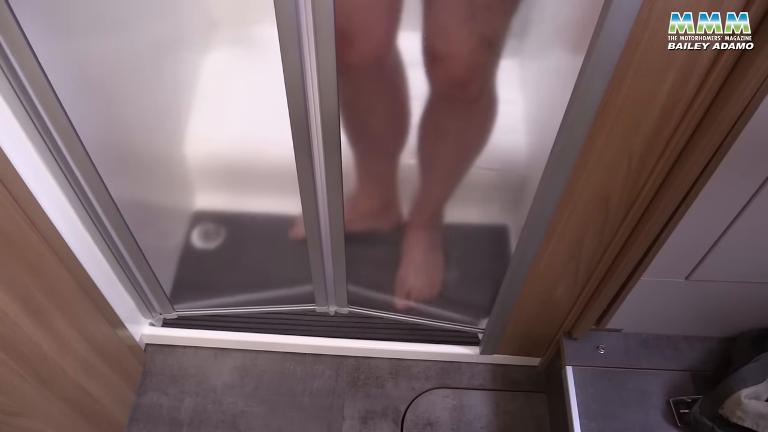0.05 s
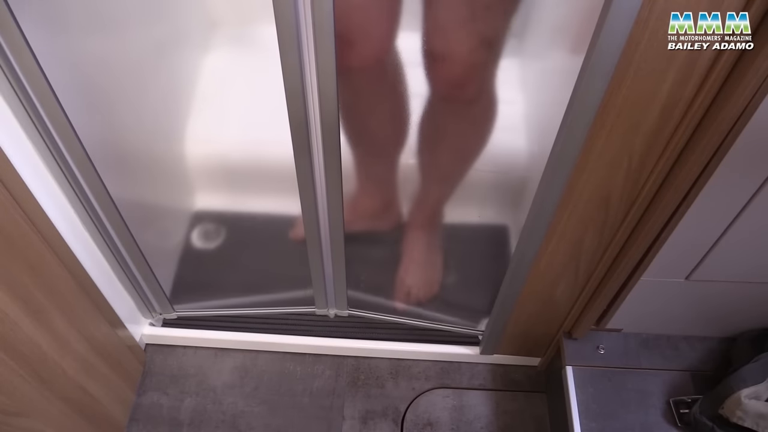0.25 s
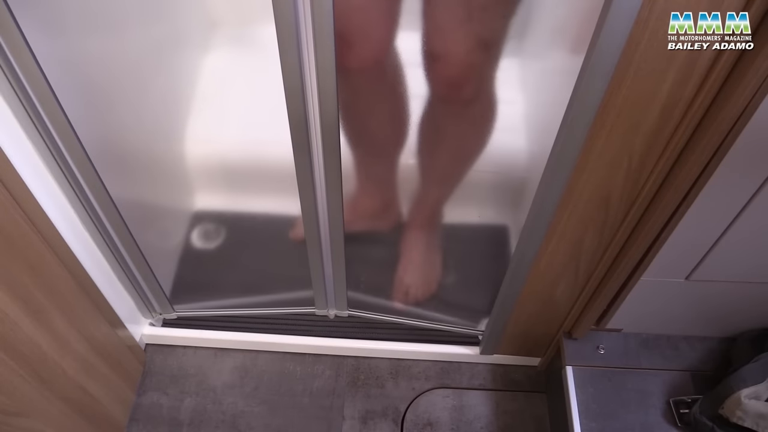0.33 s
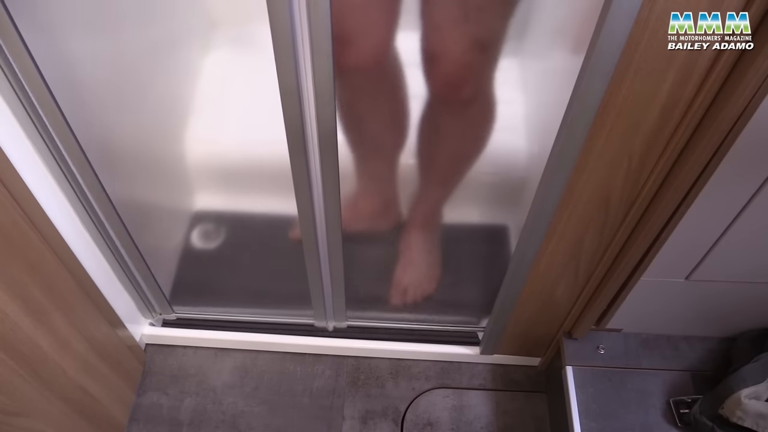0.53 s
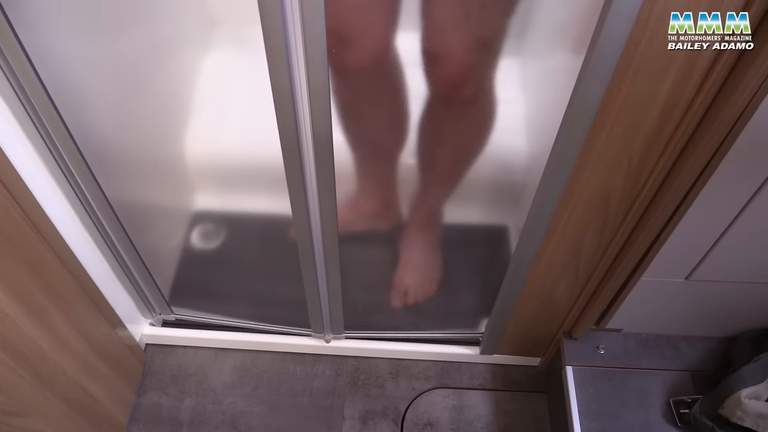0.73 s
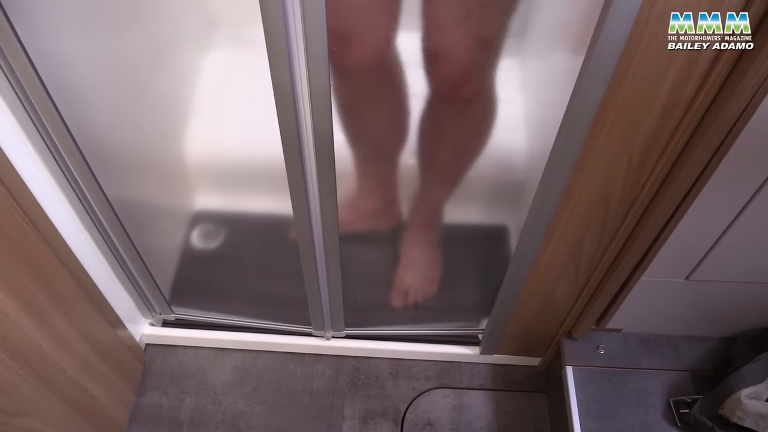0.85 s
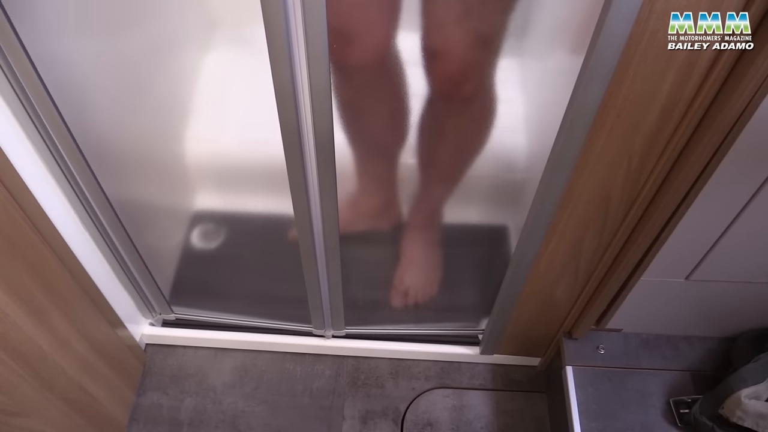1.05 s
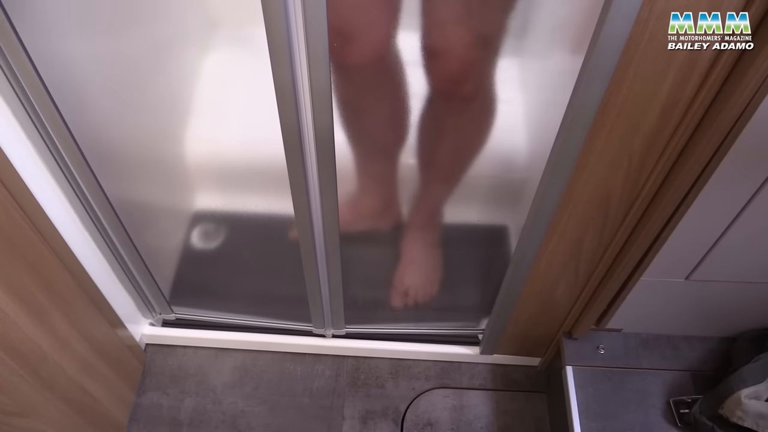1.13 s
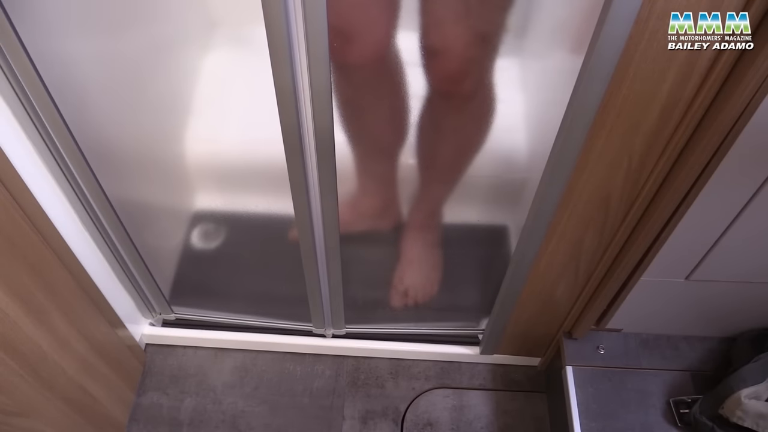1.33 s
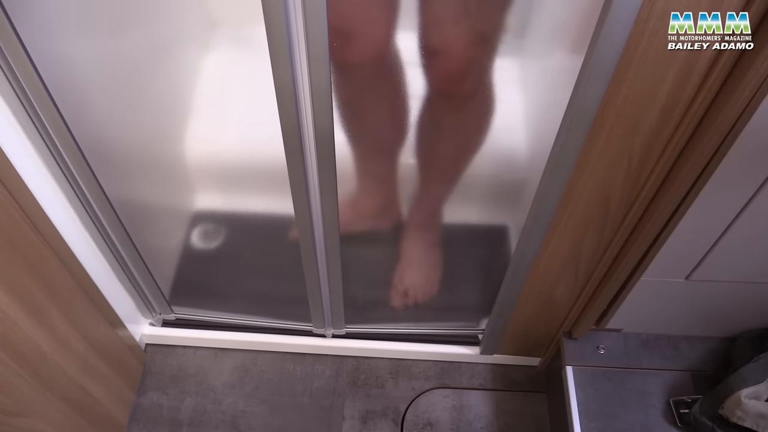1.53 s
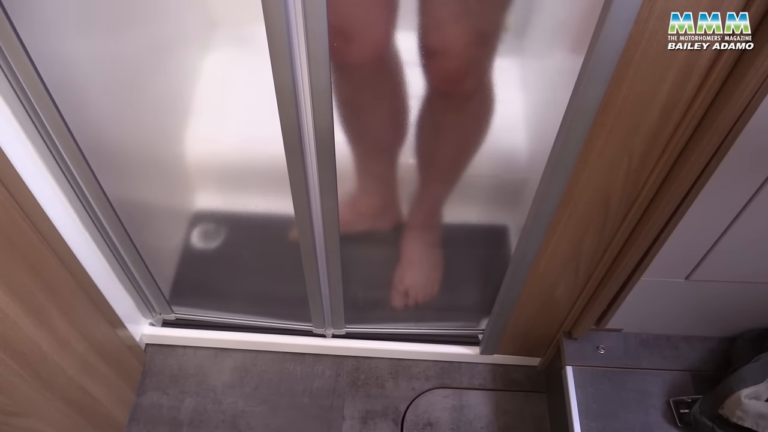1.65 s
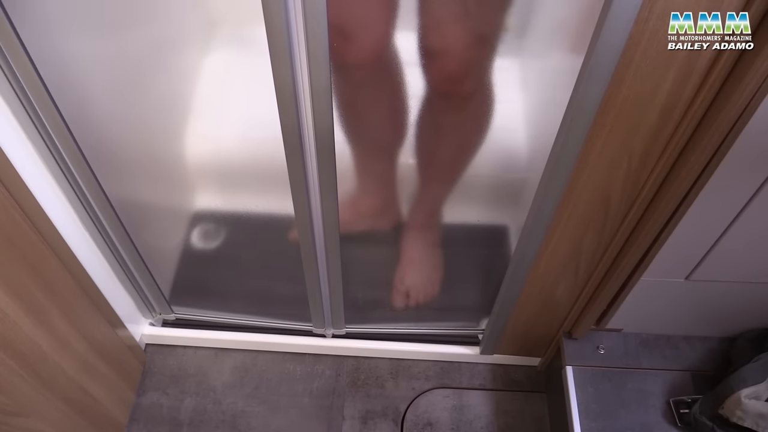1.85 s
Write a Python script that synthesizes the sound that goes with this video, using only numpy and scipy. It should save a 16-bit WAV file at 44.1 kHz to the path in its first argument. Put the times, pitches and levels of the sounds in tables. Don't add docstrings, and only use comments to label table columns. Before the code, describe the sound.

A folding shower door closes in a small hard bathroom, heard close. Faint scraping and ticks lead to a loud slap at 0.24 s with a hollow tray thud and rebounds. Panel knocks follow at 0.43 and 0.66, a rattling snap at 0.73, a clacking closure at 0.87, and a knock at 1.08. A short low groan at 1.25 and faint squeaks precede the seating thunk at 1.58, then small creaks over quiet room air.

```python
import sys
import numpy as np
from scipy import signal
from scipy.fft import rfft, irfft
from scipy.io import wavfile
from scipy.ndimage import uniform_filter1d

SR = 44100
rng = np.random.default_rng(int(sys.argv[2]) if len(sys.argv) > 2 else 0)


def store_wav(level_fs):
    pcm = np.round(np.clip(np.atleast_2d(level_fs), -1, 1) * 32767)
    wavfile.write(sys.argv[1], SR, pcm.T.astype(np.int16))


def amplitude_ratio(level_db):
    exponent = np.asarray(level_db, float) / 20
    return 10 ** exponent


N = 83790

# f/Hz, level/dB, t60/s
EDGE_MODES = [(1564, -1, .03), (1728, -6, .03), (1890, 2, .035), (2040, 0, .03), (2527, -7, .03),
              (3070, -20, .02), (3260, -24, .02)]


def colour(x, points):
    hz, db = np.array(points).T
    f = np.fft.rfftfreq(len(x), 1 / SR) + 1
    gain = amplitude_ratio(np.interp(np.log(f), np.log(hz), db))
    y = irfft(rfft(x) * gain, len(x))
    return y / y.std()


def band(x, lo_hz, hi_hz):
    sos = signal.butter(2, [lo_hz, min(hi_hz, .45 * SR)], "band", fs=SR, output="sos")
    y = signal.sosfilt(sos, x)
    return y / y.std()


def walk(rate_hz):
    k = int(SR / rate_hz)
    held = np.repeat(rng.standard_normal(N // k + 1), k)
    drift = uniform_filter1d(held, k)[:N]
    return drift / drift.std()


def add(out, start_s, x):
    i = max(int(start_s * SR), 0)
    out[i:i + len(x)] += x[:N - i]


def fade(t, t60_s):
    return np.exp(-np.log(1000) * t / t60_s)


def ring(modes, t, rise_s, buzz_db=3):
    scatter_db, detune, buzz_hz = 2.5, .005, 60
    hz, db, t60_s = np.array(modes).T[:, :, None]
    weight, shift, phase = rng.standard_normal((3, len(modes), 1))
    k = int(SR / buzz_hz)
    shake = rng.standard_normal((len(modes), len(t)))
    shake = uniform_filter1d(uniform_filter1d(shake, k), k) * np.sqrt(2.75 * k)
    gain = amplitude_ratio(db + scatter_db * weight + buzz_db * shake) * fade(t, t60_s)
    angle = 2 * np.pi * hz * (1 + detune * shift) * t + 2 * phase + buzz_db / 6 * shake[::-1]
    y = (gain * np.sin(angle)).sum(axis=0) * (1 - np.exp(-t / rise_s))
    return y / np.sqrt(uniform_filter1d(y ** 2, size=600).max())


def blows(events, frame_modes, edge_modes, panel_modes):
    frame_rise_s, panel_rise_s = 0.0033, 0.0057
    rattle_db, rattle_t60_s = 0, 0.12
    clack_noise_db, clack_t60_s, crack_t60_s = 7, .055, .07
    out, t = np.zeros(N), np.arange(SR // 3) / SR
    rise = 1 - np.exp(-t / frame_rise_s)
    for s, frame_db, panel_db, clack_db, crack_db in events:
        n = rng.standard_normal((3, len(t)))
        rattle = band(n[0], 198, 1140) * fade(t, rattle_t60_s) * rise
        frame = ring(frame_modes, t, frame_rise_s) + amplitude_ratio(rattle_db) * rattle
        panel = ring(panel_modes, t, panel_rise_s, buzz_db=1.05)
        clatter = band(band(n[1], 1300, 3100), 1300, 3100) * fade(t, clack_t60_s) * rise
        clack = ring(edge_modes, t, frame_rise_s) + amplitude_ratio(clack_noise_db) * clatter
        crack = band(n[2], 3800, 13000) * fade(t, crack_t60_s) * rise
        add(out, s, amplitude_ratio(frame_db - 4.5) * frame + amplitude_ratio(panel_db) * panel)
        add(out, s, amplitude_ratio(clack_db) * clack + amplitude_ratio(crack_db) * crack)
    return out


def unfolding_knocks():
    # t/s, frame/dB, panel/dB, clack/dB, crack/dB
    unfold_blows = [
        (.081, -59, -55, -58, -52.5),
        (.111, -38.5, -43, -48.5, -81),
        (.428, -28, -35.5, -59, -66),
        (.493, -40.5, -51, -67, -58),
        (.505, -39, -60, -48, -58),
        (.511, -34, -43, -43.5, -47),
        (.522, -42, -44, -57, -60),
        (.568, -43.5, -45, -51, -49),
        (.657, -22, -27, -40, -79),
        (.696, -41, -45, -53, -74),
    ]
    # f/Hz, level/dB, t60/s
    unfold_frame = [(490, -3, 0.034), (555.3, -2, 0.14), (633, -4.5, 0.09), (800, 10.5, 0.012),
                    (1010, 4, 0.026), (1134, -8.5, 0.043), (1282, -6.5, 0.036)]
    unfold_panel = [(269, -6.5, 0.18), (291.4, -2.5, 0.17), (363, -12.5, 0.11)]
    return blows(unfold_blows, unfold_frame, EDGE_MODES, unfold_panel)


def hinge_slams():
    # t/s, frame/dB, panel/dB, clack/dB, crack/dB
    slam_blows = [
        (.225, -32.5, -32.5, -47, -43),
        (.238, -16, -31, -40.5, -30.5),
        (.2455, -16, -15.5, -57, -56),
        (.261, -21, -21.5, -56, -65),
        (.302, -26.5, -35, -44, -57),
    ]
    # f/Hz, level/dB, t60/s
    hinge_modes = [(493, 3, 0.079), (615, 1.5, 0.12), (753, 5.5, 0.053), (900, -2, 0.071),
                   (1123, -27, 0.074), (1312, -17, 0.12)]
    folded_modes = [(293.8, -11, 0.28), (368, 0.5, 0.091), (431.5, -4.5, 0.095)]
    return blows(slam_blows, hinge_modes, EDGE_MODES, folded_modes)


def straightening_snaps():
    # t/s, frame/dB, panel/dB, clack/dB, crack/dB
    snap_blows = [
        (.7285, -19.5, -19.5, -43.5, -35.5),
        (.741, -28, -21.5, -49, -46),
        (.758, -31, -27, -55, -52),
    ]
    # f/Hz, level/dB, t60/s
    leaf_modes = [(516, 6, .06), (625, -6, 0.079), (792, 1, 0.043), (990, -11, 0.1), (1155, -4, 0.053),
                  (1250, -8, .08)]
    bent_modes = [(262.5, -3, 0.16), (293, -3, 0.17), (359.2, -5.5, .12), (441, -10.5, 0.088)]
    return blows(snap_blows, leaf_modes, EDGE_MODES, bent_modes)


def shutting_knocks():
    # t/s, frame/dB, panel/dB, clack/dB, crack/dB
    shut_blows = [
        (.864, -20.5, -18, -26.5, -34.5),
        (1.077, -28.5, -29, -48, -54),
        (1.327, -47.5, -36, -53.5, -54.5),
        (1.338, -45, -35.5, -53, -60.5),
    ]
    # f/Hz, level/dB, t60/s
    post_modes = [(487.5, 0.5, 0.11), (590, 6, 0.055), (740, 0.5, 0.061), (968, -6, 0.058),
                  (1165, 2.5, 0.055), (1353, -3.5, 0.078)]
    flat_modes = [(294, 4, .27), (373.5, -16, .14), (460.8, -18, .14)]
    return blows(shut_blows, post_modes, EDGE_MODES, flat_modes)


def seating_knocks():
    # t/s, frame/dB, panel/dB, clack/dB, crack/dB
    seat_blows = [
        (1.577, -35, -41, -45, -57),
        (1.5815, -27, -19, -40, -58.5),
    ]
    # f/Hz, level/dB, t60/s
    seated_frame = [(558, 6, 0.074), (686, 4, 0.044), (762, 1, 0.053), (883, -3, 0.038), (1030, -17, 0.054),
                    (1120, -6.5, 0.065), (1300, -3, 0.051)]
    seated_edge = [(1545, -2, .05), (1685, 0, .05), (1960, -2, .045), (2330, -2, .045), (2500, 0, .04),
                   (2770, -4, .045), (2970, -2, .04), (3190, -7, .04)]
    seated_panel = [(291, 4.5, .22), (361, -16.5, 0.17), (467, -10, 0.3), (601, -16.5, 0.24)]
    return blows(seat_blows, seated_frame, seated_edge, seated_panel)


def tray_thuds():
    # t/s, level/dB
    thud_events = [
        (0.142, -34),
        (.238, -19.5),
        (0.429, -23),
        (0.513, -34),
        (0.658, -34.5),
        (0.732, -29),
        (0.867, -32),
        (1.081, -36),
        (1.334, -38.5),
        (1.584, -35),
    ]
    # f/Hz, level/dB, t60/s
    tray_modes = [(55, -10, .2), (95, -6.5, .2), (125, 1.5, .13), (169, -6, .1)]
    out, t = np.zeros(N), np.arange(SR // 3) / SR
    for s, db in thud_events:
        add(out, s, amplitude_ratio(db) * ring(tray_modes, t, rise_s=0.003))
    return out


def swell(length_s):
    t = np.arange(int(length_s * SR)) / SR
    ramp = np.interp(t / length_s, [0, 0.44, 1], [0, 1, 0])
    ramp = ramp * (t > .004) * (t < length_s - .004)
    return t, np.abs(uniform_filter1d(ramp, size=300, mode="constant")) ** 0.94


def groans():
    # t/s, length/s, level/dB, f/Hz
    groan_events = [(0.095, .11, -40, 248), (.141, 0.071, -37.5, 118), (.289, 0.039, -19, 296),
                    (0.299, 0.049, -20, 120), (.3, 0.064, -34.5, 186), (.33, 0.053, -32.5, 280.4),
                    (0.34, 0.033, -30, 40), (0.367, .042, -20.5, 103), (0.404, 0.037, -30, 94),
                    (0.476, 0.029, -37.5, 110), (0.596, 0.056, -43, 71), (.66, .04, -29.5, 289),
                    (.663, .041, -25.5, 54), (0.701, 0.059, -29, 49.4), (0.733, .028, -21.5, 261.6),
                    (0.764, 0.042, -29.5, 87.4), (0.804, .05, -33, 90), (0.818, 0.032, -34, 279),
                    (0.931, 0.041, -35.5, 121), (0.963, 0.083, -40.5, 293), (.98, 0.057, -44.5, 111.8),
                    (1.172, 0.058, -35.5, 274), (1.224, 0.09, -17.5, 294), (1.375, 0.061, -28.5, 295.7),
                    (1.62, 0.033, -29.5, 291), (1.63, .088, -38.5, 120.4), (1.667, 0.05, -31, 268),
                    (1.725, 0.032, -42.5, 285), (1.763, 0.043, -40.5, 280.8), (1.771, 0.086, -40, 101),
                    (1.792, .07, -33.5, 291), (1.831, 0.054, -46, 70.5)]
    wobble_depth, octave_db = 0.0039, -23.5
    out, wobble = np.zeros(N), walk(40.44)
    for s, length_s, db, hz in groan_events:
        t, e = swell(length_s)
        pitch_hz = hz * (1 + wobble_depth * wobble[int(s * SR):][:len(t)])
        phase = 2 * np.pi * np.cumsum(pitch_hz) / SR
        e = e[:len(phase)]
        tone = np.sin(phase) + amplitude_ratio(octave_db) * e * np.sin(2 * phase)
        add(out, s, amplitude_ratio(db) * np.sqrt(2) * e * tone)
    return out


def scrape():
    # t/s, length/s, body/dB, hiss/dB
    strokes = [(0.069, 0.52, -46, -62), (0.231, 0.14, -32.5, -79), (0.501, 0.039, -38, -43.5),
               (0.531, 0.023, -50, -38), (0.54, 0.076, -44.5, -45.5), (0.689, 0.13, -34.5, -57.5),
               (0.824, 0.13, -43, -54.5), (0.945, 0.16, -45.5, -60.5), (1.094, 0.13, -44.5, -60),
               (1.124, 0.032, -46, -58), (1.224, 0.73, -46, -65.5), (1.312, 0.15, -48.5, -65),
               (1.609, 0.13, -50.5, -78)]
    # t/s, length/s, level/dB
    slow_rubs = [
        (1.157, 0.082, -59),
        (1.747, 0.13, -48.5),
    ]
    # f/Hz, level/dB
    body_spectrum = [(150, -4), (280, 6), (500, -2), (1000, -10), (2000, -20), (3200, -30), (4500, -60)]
    hiss_spectrum = [(2500, -0.5), (3800, -5), (4700, 0), (7000, -4), (11000, -8), (15500, -16)]
    # f/Hz, bandwidth/Hz, level/dB
    rail_bands = [(4700, 500, -13), (6900, 500, -13)]
    grit_db, stick_db, stick_hz = 1.5, 1.5, 63.46
    stroke_edge_s, stroke_sag_db = .006, 11
    rail_from_s, rail_to_s = .545, .625
    t = np.arange(N) / SR
    grit = rng.standard_normal(N) * amplitude_ratio(grit_db * rng.exponential(size=N))
    rail = sum(amplitude_ratio(db) * band(grit, hz - w / 2, hz + w / 2) for hz, w, db in rail_bands)
    hiss = colour(grit, hiss_spectrum) + rail * ((t > rail_from_s) & (t < rail_to_s))
    body_gain, hiss_gain = np.zeros(N), np.zeros(N)
    for s, length_s, body_db, hiss_db in strokes:
        on = np.clip(np.minimum(t - s, (s + length_s - t) / 2) / stroke_edge_s, 0, 1)
        on = on * amplitude_ratio(-stroke_sag_db * np.clip((t - s) / length_s, 0, 1))
        body_gain += amplitude_ratio(body_db) * on
        hiss_gain += amplitude_ratio(hiss_db) * on
    for s, length_s, db in slow_rubs:
        add(body_gain, s, amplitude_ratio(db) * swell(length_s)[1])
    slide = colour(grit, body_spectrum) * body_gain + hiss * hiss_gain
    return slide * amplitude_ratio(stick_db * walk(stick_hz))


def ticks():
    # t/s, level/dB, f/Hz
    tick_events = [(0.046, -64, 11100), (0.064, -56.5, 3860), (0.139, -56.5, 4100), (0.238, -31, 4500),
                   (0.246, -35.5, 4800), (0.302, -39, 4680), (.304, -49.5, 7650), (0.368, -62, 7800),
                   (0.427, -47.5, 4700), (0.546, -44, 7800), (0.695, -49, 4900), (0.847, -62, 7200),
                   (0.95, -57, 9000), (1.126, -71, 5700), (1.324, -58, 6450), (1.401, -60.5, 5600)]
    t60_s, ring_db, spread = 0.01, 3, 0.17
    out, t = np.zeros(N), np.arange(SR // 8) / SR
    for s, db, hz in tick_events:
        n = rng.standard_normal((2, len(t)))
        click = band(n[0], 2900, 15000) * fade(t, t60_s)
        ringing = band(n[1], (1 - spread) * hz, (1 + spread) * hz) * fade(t, 5.4 * t60_s)
        add(out, s, amplitude_ratio(db) * (click + amplitude_ratio(ring_db) * ringing))
    return out


def squeaks():
    # t/s, length/s, level/dB, from f/Hz, to f/Hz
    squeak_events = [(1.038, 0.045, -72, 10050, 10800), (1.073, .075, -68, 10700, 11050),
                     (1.124, 0.074, -65, 9870, 10000), (1.179, 0.046, -65, 10600, 10960),
                     (1.203, .08, -65.5, 10300, 10560), (1.2, 0.06, -66, 11100, 11600),
                     (1.2, 0.051, -68.5, 11900, 12100), (1.177, 0.1, -70, 13400, 13550),
                     (1.236, 0.11, -62.5, 2855, 2856), (1.339, 0.13, -59, 2855, 2795),
                     (1.46, 0.094, -63, 2970, 2670), (1.267, 0.3, -59.5, 1930, 1973)]
    rel_width, flatness = .017, .3
    out = np.zeros(N)
    for s, length_s, db, from_hz, to_hz in squeak_events:
        t, e = swell(length_s)
        hz = from_hz + (to_hz - from_hz) * t / length_s
        tone = np.sin(2 * np.pi * np.cumsum(hz) / SR)
        rough = band(rng.standard_normal(N), 12, rel_width * to_hz)[:len(t)]
        add(out, s, amplitude_ratio(db + walk(43)[:len(t)]) * rough * e ** flatness * tone)
    return out


def room(x):
    t, n = np.arange(SR // 2) / SR, rng.standard_normal((2, SR // 2))
    low = band(n[0], 110, 1860) * fade(t, 0.24)
    high = 1.69 * band(n[1], 1900, 22000) * fade(t, 0.29)
    tail = (low + high) * (t > .003)
    return signal.fftconvolve(x, tail / np.sqrt((tail ** 2).sum()))[:N]


def still_air():
    # f/Hz, level/dB
    air_spectrum = [(35, -38), (70, -9), (115, 11), (190, -12), (290, -10.5), (1000, -22.5), (3500, -30.5),
                    (16000, -40.5)]
    air_db, drift_db, calm_from_s, calm_db_per_s = -53, 0.59, 1.65, -5
    calm_db = calm_db_per_s * np.maximum(np.arange(N) / SR - calm_from_s, 0)
    return colour(rng.standard_normal(N), air_spectrum) * amplitude_ratio(air_db + drift_db * walk(5.2) + calm_db)


def scene():
    door = unfolding_knocks() + hinge_slams() + straightening_snaps() + shutting_knocks() + seating_knocks()
    door = door + tray_thuds() + scrape() + ticks() + squeaks()
    room_db = -12
    return (door + groans() + amplitude_ratio(room_db) * room(door) + still_air())[None]


def roll_off(x):
    return signal.sosfilt(signal.butter(12, 16470, fs=SR, output="sos"), x)


def record(dry):
    low_cut = signal.butter(2, 40, "high", fs=SR, output="sos")
    top_cut = signal.ellip(8, .2, 60, 16100, fs=SR, output="sos")
    mix = signal.sosfilt(top_cut, signal.sosfilt(low_cut, dry))
    return roll_off(mix)


dry = scene()
out = record(dry)
store_wav(out)
```